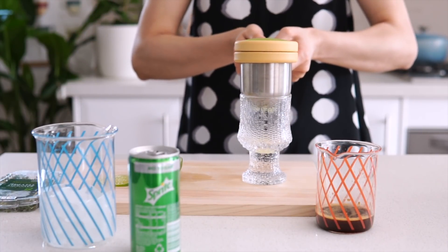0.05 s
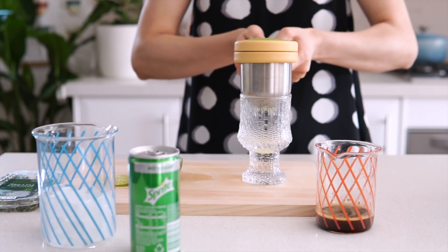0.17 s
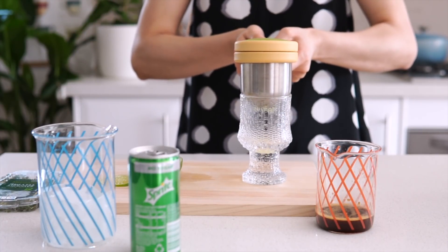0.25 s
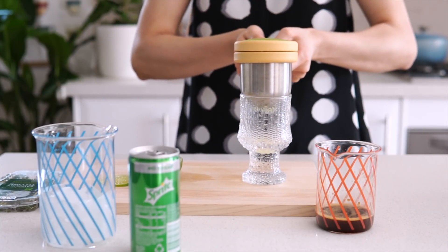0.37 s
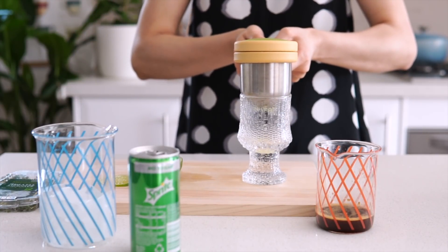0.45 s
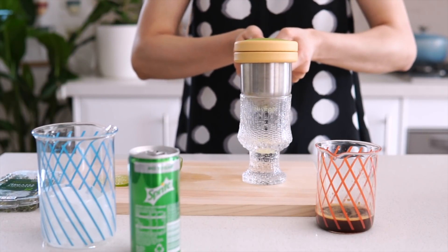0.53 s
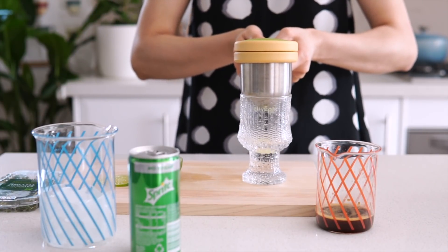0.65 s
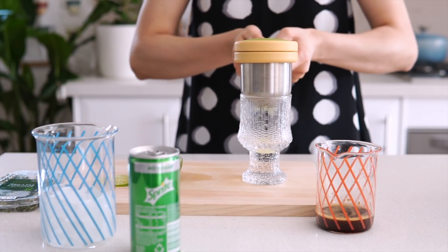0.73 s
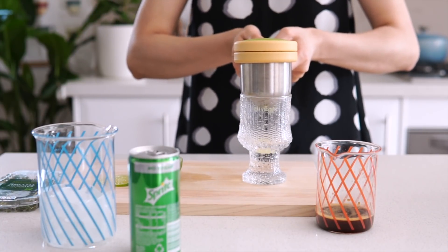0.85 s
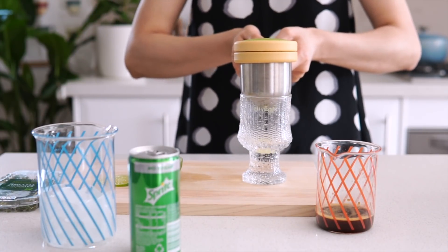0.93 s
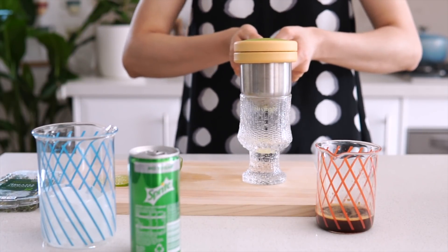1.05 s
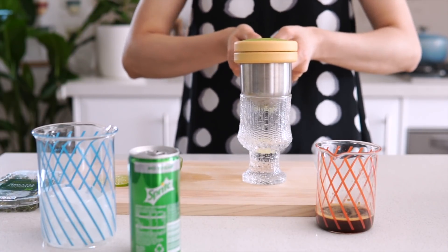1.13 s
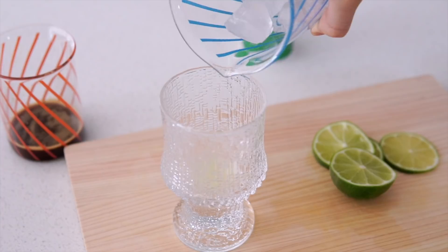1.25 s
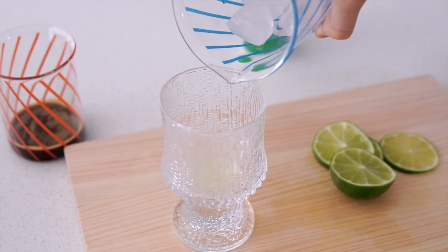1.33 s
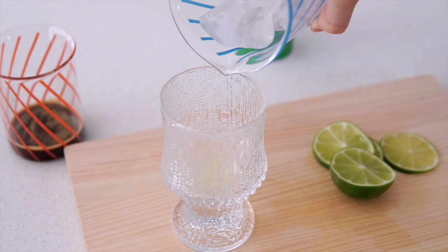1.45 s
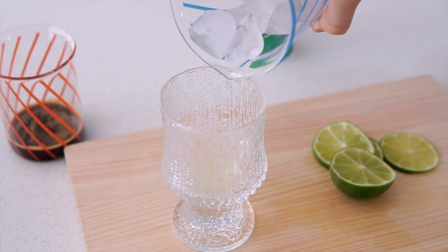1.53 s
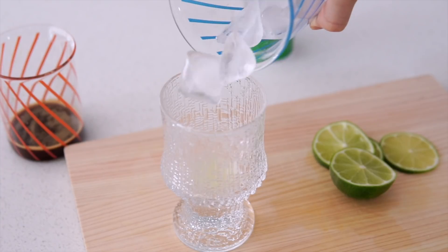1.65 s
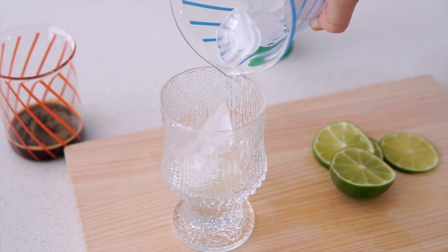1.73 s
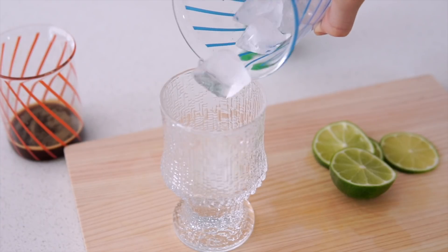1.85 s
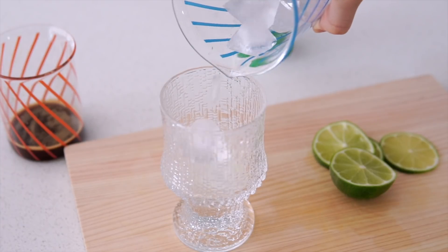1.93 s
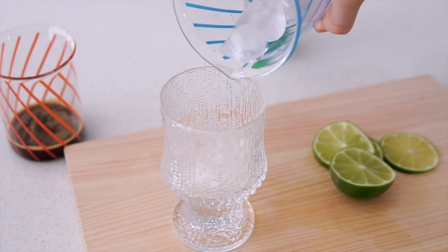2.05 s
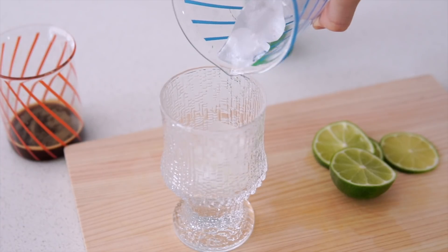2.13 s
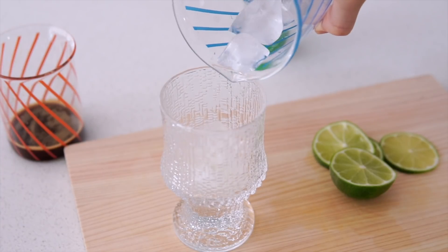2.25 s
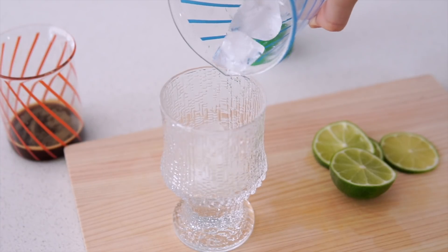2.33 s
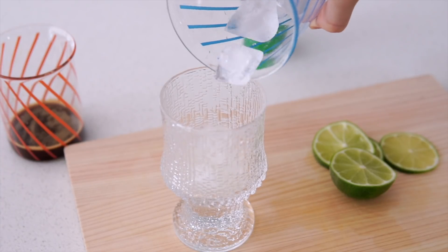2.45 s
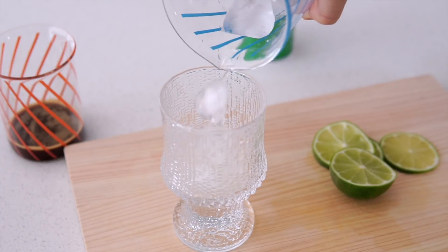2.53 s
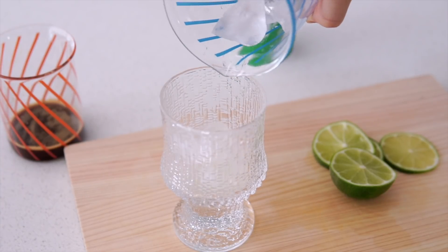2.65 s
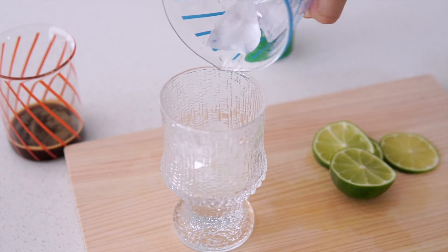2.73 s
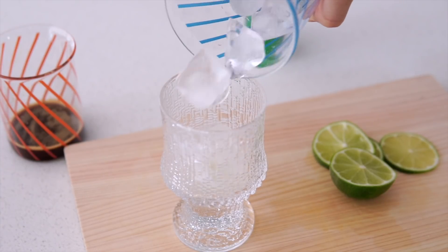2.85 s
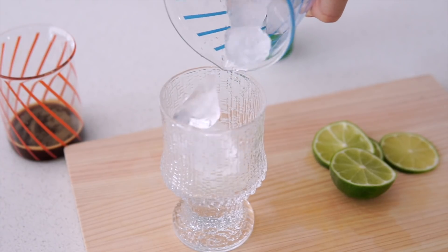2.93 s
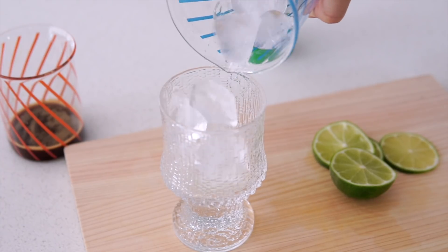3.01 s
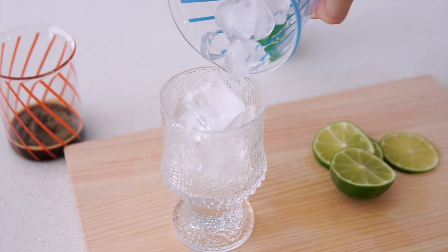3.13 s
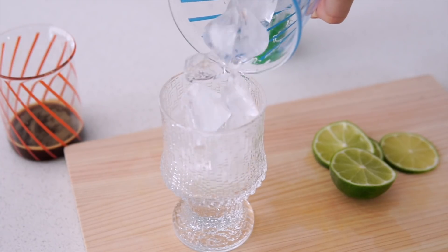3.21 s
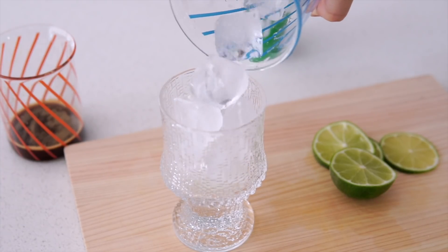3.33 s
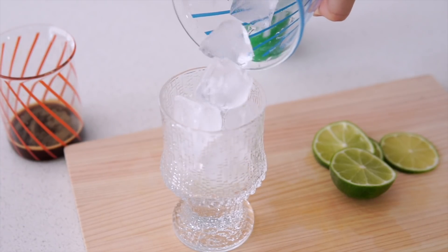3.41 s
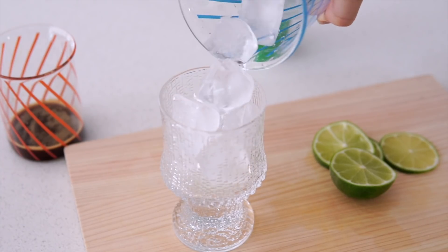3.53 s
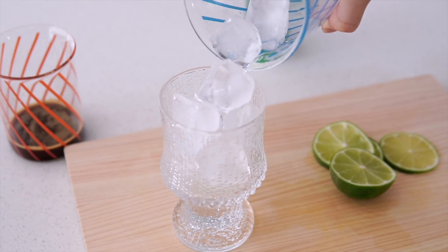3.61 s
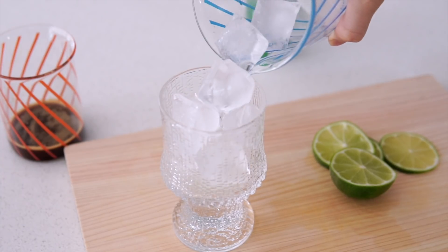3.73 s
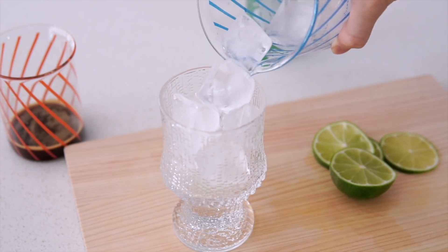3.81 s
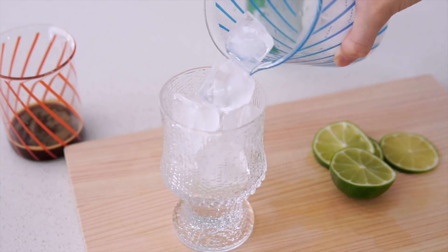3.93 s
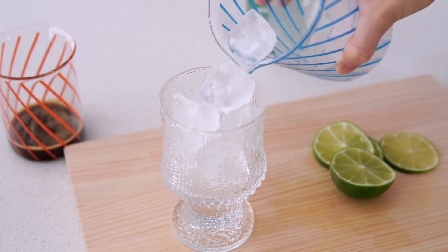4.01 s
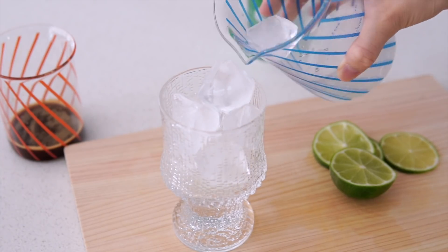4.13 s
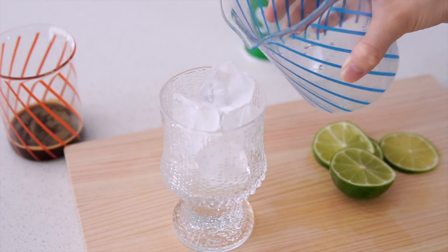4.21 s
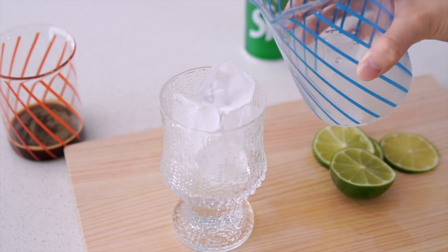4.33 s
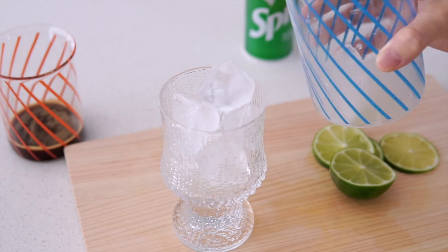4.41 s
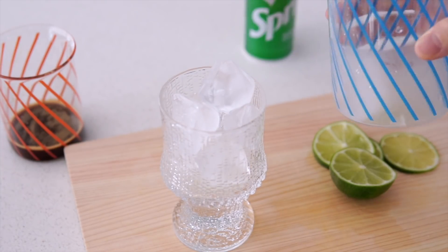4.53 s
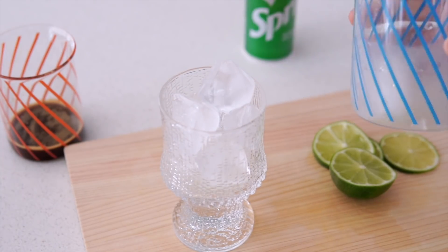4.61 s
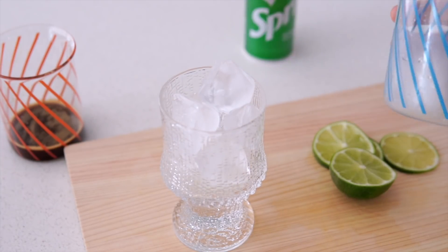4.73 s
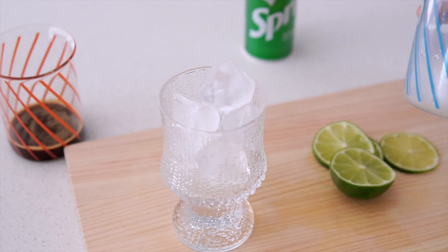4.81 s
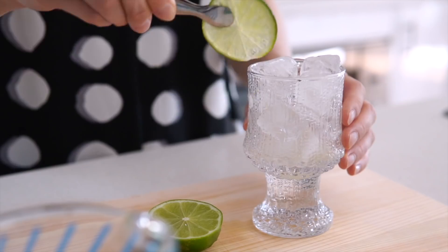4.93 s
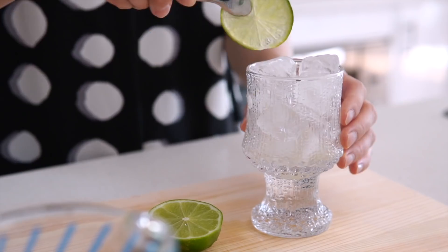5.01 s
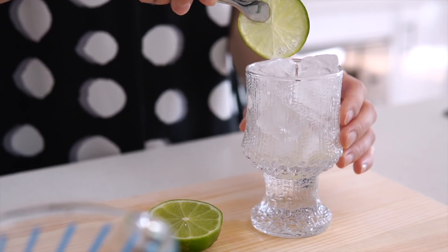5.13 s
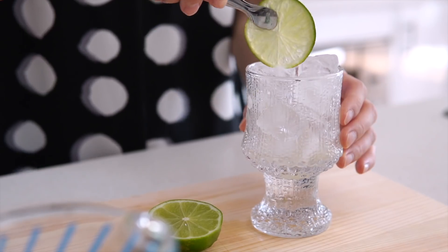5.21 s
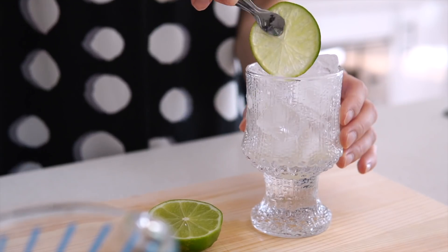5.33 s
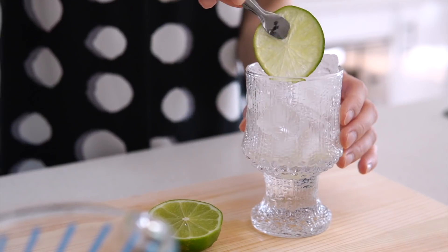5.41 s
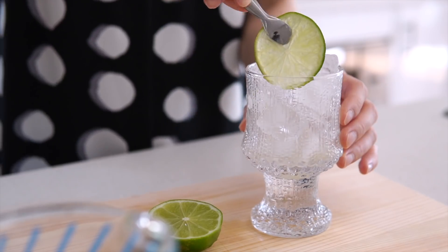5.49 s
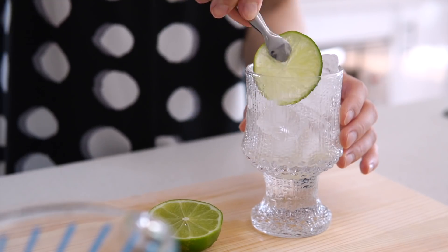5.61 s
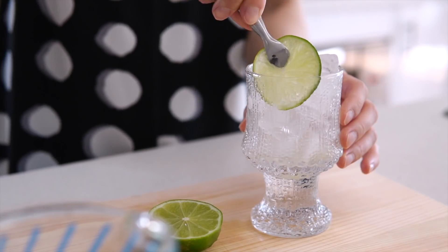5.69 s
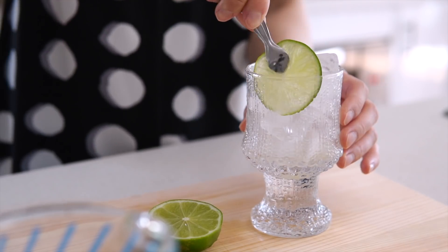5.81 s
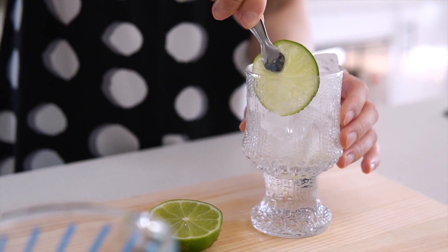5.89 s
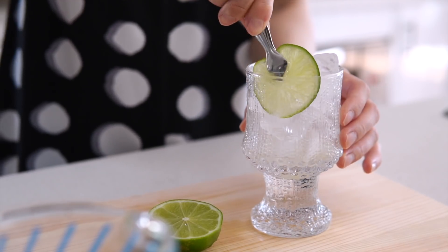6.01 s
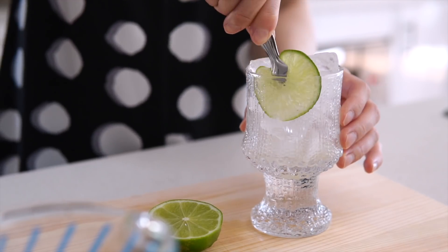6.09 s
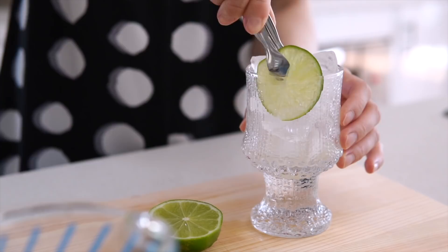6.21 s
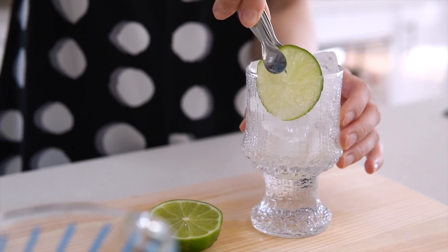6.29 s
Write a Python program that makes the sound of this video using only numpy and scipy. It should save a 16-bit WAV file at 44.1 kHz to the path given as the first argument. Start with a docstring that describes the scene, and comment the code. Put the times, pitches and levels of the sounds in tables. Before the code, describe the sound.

Ice cubes tumble from a thin glass beaker into a heavy goblet, clattering and ringing loudly up close, then a few faint ticks in a kitchen.

```python
"""Ice tipped into a goblet

Ice cubes are tipped from a thin glass beaker into a heavy goblet on a wooden board, in a kitchen.
Noise bursts and short tones make the clacks; showers of them make the jostling, and a lime slice's later rubs.
Both glasses ring as fading sine waves, and their air hollows hoot as resonances stirred by the knocks.
The microphone is close and the loudest blows clip; echoes, a soft rumble and a mains hum fill the room."""
import sys
import numpy as np
from scipy import signal
from scipy.fft import rfft, irfft
from scipy.io import wavfile

SR = 44100
rng = np.random.default_rng(int(sys.argv[2]) if len(sys.argv) > 2 else 0)


def digitize_waveform(pressure):
    """Quantize a signal to 16-bit integers and store it at the path in sys.argv[1].

    Rows of a 2-D input are taken as channels; values are limited to [-1, 1].
    """
    field = np.atleast_2d(pressure).T
    bounded = np.clip(field, -1, 1)
    quanta = np.round(bounded * 32767).astype(np.int16)
    wavfile.write(sys.argv[1], SR, quanta)


N = 280035
TIME = np.arange(N) / SR
SECOND = np.arange(SR) / SR  # time axis of one single sound, s
# In all tables, t60 is the time a sound takes to fade by 60 dB; levels are relative.


def amp(db):
    """Turns decibels into a plain factor."""
    return 10 ** (np.asarray(db) / 20)


def unit(x):
    """Scales to an energy of one."""
    return x / np.sqrt(np.sum(x ** 2) + 1e-20)


def read(points, hz):
    """Reads a table between its points, on a log-frequency axis."""
    f, value = np.transpose(points)
    return np.interp(np.log(hz + 1), np.log(f + 1), value)


def add(mix, s, sound):
    """Mixes a sound in at time s."""
    part = mix[max(round(s * SR), 0):][:len(sound)]
    part += sound[:len(part)]


def coloured(x, db):
    """Filters x with the gain db on its FFT bins, without sounding ahead of time (minimum phase)."""
    cepstrum = irfft(db * np.log(10) / 20)
    cepstrum[1:len(x) // 2] *= 2
    cepstrum[len(x) // 2 + 1:] = 0
    return irfft(rfft(x) * np.exp(rfft(cepstrum)))


def hollow(x, curve, width_hz):
    """A resonance, as of trapped air, whose pitch and strength follow a curve; a narrow one rings longer."""
    s, hz, db = np.transpose(curve)
    # shift the pitch down to zero, smooth there, and shift back up
    turn = np.exp(2j * np.pi * np.cumsum(np.interp(TIME, s, hz)) / SR)
    r = np.exp(-np.pi * width_hz / SR)
    driven = x * amp(np.interp(TIME, s, db))
    smooth = signal.lfilter([1 - r], [1, -r], driven / turn + 1e-18)
    return 2 * (turn * smooth).real


# How the room's rumble is spread over pitch: f/Hz, level/dB
RUMBLE_SPECTRUM = [(12, -54.5), (20, -13.5), (32, -7.5), (46, -3), (65, 0.5), (81, -10), (204, -11),
                   (399, -19.5), (485, -16.5), (2260, -35), (16000, -41.5)]


def room_tone(start_db=-50.5, rise_db=2, hum_db=-49, hum_hz=60):
    """A soft rumble of filtered noise that slowly grows, and a mains hum as one sine wave."""
    gain = amp(read(RUMBLE_SPECTRUM, np.fft.rfftfreq(N, 1 / SR)))
    noise = irfft(rfft(rng.standard_normal(N)) * gain, N)
    rumble = amp(start_db + rise_db * TIME / TIME[-1]) * unit(noise) * np.sqrt(N)
    return rumble + amp(hum_db) * np.sin(2 * np.pi * hum_hz * TIME)


# Basic colour of a clack: f/Hz, level/dB
CLACK_SPECTRUM = [(30, -43), (100, -29), (500, -21), (1200, 2), (2200, 1), (4500, 0), (7000, -3.5),
                  (11000, -8), (16000, -16.5)]
CRACK_T60 = .005  # s


def clack(centre_hz, treble_db, t60, focus_db=9, octaves=.5, crack_db=1, cube_db=-1, cube_t60=.034):
    """One contact of ice: a crack, a dense short rattle and a few brief tones of the cube."""
    t, hz = np.arange(2048) / SR, np.fft.rfftfreq(2048, 1 / SR)
    crack, rattle = rng.standard_normal((2, len(t)))
    burst = unit(rattle * amp(-60 * t / t60))
    burst += amp(crack_db) * unit(crack * amp(-60 * t / CRACK_T60))
    # a hump around the centre pitch
    focus = focus_db * np.exp(-.5 * (np.log2((hz + 1) / centre_hz) / octaves) ** 2)
    shelf = read([(5000, 0.0071), (10000, treble_db)], hz)  # harder contacts are brighter
    burst = coloured(burst, read(CLACK_SPECTRUM, hz) + focus + shelf)
    tones_hz = centre_hz * 2 ** (rng.standard_normal(size=(3, 1)) / 4)
    tones = np.sin(2 * np.pi * tones_hz * t).sum(0) * amp(-60 * t / cube_t60)
    return unit(unit(burst) + amp(cube_db) * unit(tones))


# Single knocks and faint ticks, mostly of ice, the low-pitched ones heavy landings:
# t/s, level/dB, centre of the colour f/Hz
SINGLE_KNOCKS = [(0.189, -38, 4550), (1.264, -12.5, 2410), (1.274, -11.5, 3450), (1.3102, -7, 2180),
                 (1.3271, -5, 2730), (1.3596, -2.5, 3330), (1.3793, 9, 4500), (1.392, 9, 4440),
                 (1.397, 3, 4300), (1.411, 6, 4230), (1.421, 6.5, 5660), (1.429, 7, 7080), (1.463, 7, 4885),
                 (1.5146, -5, 2670), (1.5468, -1, 3680), (1.5578, 1.5, 3533), (1.5836, -2, 4904),
                 (1.6639, -0.5, 4010), (1.775, -2, 1450), (1.8461, 10.5, 3500), (1.8966, -2.5, 3280),
                 (1.9641, 3.5, 1230), (2.0056, -0.5, 4500), (2.0525, 8.5, 9470), (2.08, -1, 8800),
                 (2.021, 2.5, 9470), (2.355, -19.5, 4200), (2.5, -11.5, 5270), (2.609, -2, 1470),
                 (2.7985, -3, 3000), (2.833, -3.5, 3930), (2.874, -2, 4400), (2.925, -1, 3090),
                 (2.946, 6, 1860), (2.965, -2.5, 2430), (3.122, 6.5, 4200), (3.199, -0.5, 3540),
                 (3.259, -5, 3140), (3.286, 2.5, 3450), (3.305, -1.5, 3760), (3.337, 1, 2890),
                 (3.3786, 1, 3720), (3.429, -2.5, 5400), (3.471, -7.5, 3000), (3.5865, -4.5, 3000),
                 (3.9209, -8, 1423), (3.9693, 4, 6440), (4.0754, -9, 3400), (4.2177, -13.5, 3360),
                 (4.2401, 9.5, 4445), (4.249, 11.5, 4580), (4.2937, 2, 3250), (4.3213, -1.5, 4880),
                 (4.3311, -2, 4480), (4.46, -5.5, 3800), (4.4817, -11, 5550), (4.5495, -13.5, 2820),
                 (4.85, -35, 2586), (6.052, -19, 1870), (6.0594, -11, 2530), (6.1748, -12.5, 3000),
                 (6.215, -10.5, 3880), (6.3269, -15.5, 3200)]
# When the knocks happen inside the beaker: start t/s, end t/s
IN_BEAKER = [(0, 1.7), (3.95, 5)]
# Colour of the thud through the board: f/Hz, level/dB
THUD_SPECTRUM = [(30, -16.5), (100, -9), (180, -6), (400, -3.5), (1200, 5.5), (3000, -23.5), (9000, -58)]
MIDDLE_HZ, RATTLE_T60 = 4200, .02  # colour of an ordinary knock, Hz; fading of its rattle, s
# strong knocks and high-pitched ones have more treble
TREBLE_DB, TREBLE_DB_PER_DB, TREBLE_DB_PER_OCTAVE = 3.5, .15, 3
# low-pitched knocks are heavy and push harder; the hand-held beaker passes little of it to the board
WEIGHT_DB_PER_OCTAVE, HELD_DB = 6, -10.5


def knocks(clack_db=13, thud_db=-1, thud_t60=0.017, rattle_db=-3):
    """Each knock gives a bright clack and a dull push into glass and board."""
    clacks, thuds = np.zeros((2, N))
    t, hz = np.arange(2048) / SR, np.fft.rfftfreq(2048, 1 / SR)
    wall_knocks = [(s, db, MIDDLE_HZ) for s, db, _, _ in GOBLET_BLOWS]
    for s, db, centre_hz in SINGLE_KNOCKS + wall_knocks:
        octaves = np.log2(centre_hz / MIDDLE_HZ)
        held = any(a < s < b for a, b in IN_BEAKER)
        treble_db = TREBLE_DB + TREBLE_DB_PER_DB * db + TREBLE_DB_PER_OCTAVE * octaves
        weight_db = db - WEIGHT_DB_PER_OCTAVE * octaves + HELD_DB * held
        add(clacks, s, amp(db + clack_db) * clack(centre_hz, treble_db, RATTLE_T60))
        # a push is a single click with a short noise tail
        tail = unit(rng.standard_normal(len(t)) * amp(-60 * t / thud_t60))
        push = (t == 0) + amp(rattle_db) * tail
        add(thuds, s, amp(weight_db + thud_db) * unit(coloured(push, read(THUD_SPECTRUM, hz))))
    return clacks, thuds


# Path of the goblet's air tone: t/s, f/Hz, level/dB
GOBLET_AIR_PATH = [(1.4, 1000, 2.5), (1.7, 1100, -14), (1.78, 1120, 3.5), (2.95, 1150, 2), (3.3, 1080, 3),
                   (3.6, 990, 2.5), (4.0, 980, -24.5), (4.6, 980, -24), (6.1, 953.6, 5.5)]


def goblet_air(push, level_db=6):
    """The air in the goblet is a broad resonance, set hooting by each push."""
    return amp(level_db) * hollow(push, GOBLET_AIR_PATH, width_hz=47)


# Path of the beaker's air tone: t/s, f/Hz, level/dB
BEAKER_AIR_PATH = [(1.25, 707, 5.5), (1.449, 718, -2.5), (1.65, 690, -2), (1.8, 672, -10.5),
                   (2.85, 662, -6.5), (3.4, 614, -10), (3.95, 580, 8.5), (4.24, 617, 10), (4.55, 639, -5.5)]
# Bumps of the empty beaker that set its air hooting: t/s, level/dB, f/Hz, t60/s
BEAKER_HOOTS = [(3.922, -24, 606, .8), (4.293, -10, 640, .12), (4.297, -23, 613, .45)]


def beaker_air(push, level_db=9):
    """The air in the emptying beaker hoots under each push, and bumps of the beaker add fading sine waves."""
    out = amp(level_db) * hollow(push, BEAKER_AIR_PATH, width_hz=17)
    for s, db, hz, t60 in BEAKER_HOOTS:
        add(out, s, amp(db - 60 * SECOND / t60) * np.sin(2 * np.pi * hz * SECOND))
    return out


# Kitchen reverberation: f/Hz, t60/s, level/dB
KITCHEN_ECHO = [(145.9, 0.097, -13), (684, 0.76, -5.5), (1360, 0.68, -13), (3000, 0.59, -11),
                (4760, 0.69, -14.5), (9500, 0.24, -9.5), (16000, 0.59, -21)]


def kitchen(x, gap_s=0.00075, build_s=0.004):
    """Sparse reflections of random sign, each band dying at its own speed."""
    room, taps = np.array(KITCHEN_ECHO), np.zeros(SR)
    # one reflection somewhere in every ten samples
    at = np.arange(0, SR - 10, 10)
    taps[at + rng.integers(0, 10, len(at))] = rng.choice([-1., 1.], len(at))
    taps *= np.clip((SECOND - gap_s) / build_s, 0, 1)
    hz, t, bands = signal.stft(taps, SR, nperseg=256)
    t60 = read(room[:, :2], hz)[:, None]
    tail = unit(signal.istft(bands * amp(-60 * t / t60), SR, nperseg=256)[1][:SR])
    tail = coloured(tail, read(room[:, ::2], np.fft.rfftfreq(SR, 1 / SR)))
    return signal.fftconvolve(x, tail)[:N]


# a slide or rub starts quickly, loses speed and comes to rest
SLIDE_ATTACK_S, SLIDE_SAG_DB_PER_S, SLIDE_REST_DB_PER_S = 0.01, -16, -220


def sliding(slides):
    """Strength of the sliding: each slide has an attack, a sagging hold and a release."""
    out = np.zeros(N)
    for s, length, db in slides:
        fade_db = SLIDE_SAG_DB_PER_S * SECOND + SLIDE_REST_DB_PER_S * np.maximum(SECOND - length, 0)
        add(out, s, np.minimum(SECOND / SLIDE_ATTACK_S, 1) * amp(db + fade_db))
    return out


def contacts(slides, per_s, spread_db, centre_hz, treble_db, t60, count=24):
    """Many small contacts between sliding surfaces, a few larger than the rest."""
    happens = rng.random(N) < per_s / SR
    sizes = amp(spread_db * np.minimum(rng.exponential(1, N), 2)) * happens
    sizes = unit(sizes) * np.sqrt(N) * sliding(slides)
    # a stock of different clacks, picked at random for each contact
    cubes = [clack(centre_hz * 2 ** (.5 * rng.standard_normal()), treble_db, t60) for _ in range(count)]
    which, out = rng.integers(0, count, N), np.zeros(N)
    for i in np.flatnonzero(sizes):
        add(out, i / SR, sizes[i] * cubes[which[i]])
    return out


# Slides of the cubes over each other: start t/s, length t/s, level/dB
CUBE_SLIDES = [(1.238, 0.034, -31), (1.385, 0.053, -12), (1.55, 0.36, -24), (1.78, 0.33, -19),
               (2.29, 0.39, -40.5), (2.75, 0.29, -24.5), (2.94, 0.22, -13.5), (3.18, .22, -18.5),
               (3.7, 0.25, -51.5), (3.96, 0.21, -42), (4.245, 0.085, -28), (4.46, 0.086, -32),
               (4.79, 0.052, -59)]
# Rubs of the lime slice over the ice: start t/s, length t/s, level/dB
LIME_RUBS = [(5.63, 0.22, -56), (5.92, 0.15, -55.5), (6.04, 0.071, -42.5), (6.18, 0.054, -32),
             (6.29, .06, -43)]


def jostle():
    """Cubes slide over each other; later the lime slice rubs across them, duller and with denser contacts."""
    cubes = contacts(CUBE_SLIDES, per_s=150, spread_db=4, centre_hz=3800, treble_db=0, t60=.011)
    lime = contacts(LIME_RUBS, per_s=450, spread_db=10.5, centre_hz=3630, treble_db=-16, t60=0.015)
    return cubes + lime


# Ringing tones (modes) of the goblet wall, swinging freely: f/Hz, level/dB, t60/s
GOBLET_MODES = [(2411, 4.5, .8), (4431, -1, .42), (7111, -1, .36), (9350, -1, .25), (10510, -7, .22),
                (11370, -3, .18), (11470, -5, .32), (14820, -12, .2), (15630, -7, .2)]
GRIP_S = 5  # a hand grips the glass, s


def chatter(ice, level_db=8, freedom=.3):
    """Ice that tumbles inside the goblet keeps its wall modes chiming, until a hand grips the glass."""
    in_beaker = np.any([(a < TIME) & (TIME < b) for a, b in IN_BEAKER], axis=0)
    inside = ice * (TIME < GRIP_S) * ~in_beaker
    out = np.zeros(N)
    for hz, db, t60 in GOBLET_MODES:
        width_hz = np.log(1000) / np.pi / (t60 * freedom)  # the ice shortens t60
        out += hollow(inside, [(0, hz, db + level_db)], width_hz)
    return out


# Blows on the goblet wall: t/s, clack level/dB, ring level/dB,
# hardness level/dB (how far the second mode stands over the lowest)
GOBLET_BLOWS = [(1.736, -6.5, -8.5, -6), (1.785, 8, -5, -15), (1.826, 5.5, -7.5, -17),
                (1.973, -2, -21.5, 1.5), (2.031, -3.5, -21.5, 10), (2.07, -3, -16.5, 9),
                (2.166, -10.5, -14.5, -11), (2.463, -19, -28.5, -9.5), (2.6242, 9.5, -20, 1.5),
                (2.642, 2.5, -6, 0.5), (2.682, -7.5, -32, 27), (2.735, 0, -26, 11), (2.9384, 9, -8.5, 4.5),
                (2.979, 0, -11, 18), (3.022, 6.5, -12.5, 20), (3.063, 8, -18.5, 28), (3.107, -9, -12, -2),
                (3.142, 1.5, -15.5, 14.5), (3.167, 11.5, -13.5, 11.5), (3.225, 4.5, -27.5, 22.5),
                (3.328, 4, -26.5, 11.5), (6.0833, -9.5, -52, 12)]
# Ice leaning on the wall shortens the ring: t/s, factor on t60
GOBLET_FREEDOM = [(1.7, 0.77), (2.4, 0.58), (2.7, 0.33), (3.0, 0.22), (3.5, 0.14)]
HIGH_MODES_DB, HIGH_MODES_SHARE = -5.5, 0.78  # the high modes lie lower and follow a share of the hardness


def goblet(level_db=-1.5, twin_db=-11, split_hz=13, jolt_turns=.28):
    """Blows pour energy into the wall modes and jolt their swing; each mode beats with a close twin."""
    out = np.zeros(N)
    for k, (hz, db, t60) in enumerate(GOBLET_MODES):
        energy, jolts = np.zeros((2, N))
        for s, _, ring_db, hard_db in GOBLET_BLOWS:
            mode_db = ring_db + np.array([0, hard_db, HIGH_MODES_DB + HIGH_MODES_SHARE * hard_db])
            freedom = np.interp(s, *np.transpose(GOBLET_FREEDOM))
            fade = np.exp(-2 * np.log(1000) * SECOND / (t60 * freedom))
            add(energy, s, amp(mode_db[min(k, 2)]) ** 2 * fade)
            jolts[round(s * SR)] = jolt_turns * rng.standard_normal()
        turns = hz * TIME + np.cumsum(jolts)
        # the twin lies lower, and further away for the higher modes
        twin_turns = turns - split_hz * np.sqrt(k + 1) * TIME + rng.random()
        pair = np.sin(2 * np.pi * turns) + amp(twin_db) * np.sin(2 * np.pi * twin_turns)
        out += amp(db + level_db) * np.sqrt(energy) * pair
    return out


# Clear clinks of a cube on a glass rim: t/s, level/dB, factor on the low modes' f,
# factor on the high modes' f, factor on t60
RIM_CLINKS = [(3.589, -19, .853, .9, .5), (3.921, 6, 1.018, 1.008, .58), (3.969, -13, 1.012, 1.015, 1.4),
              (4.2397, 4, .965, .96, .27), (4.462, -16, .86, 1.0, .4), (4.549, -29, .79, .99, .7)]
# Modes of a clink, before those factors: f/Hz, level/dB, t60/s
CLINK_MODES = [(2763, -25, 0.17), (2984, -6.5, 0.21), (3116, 1, 0.14), (4470, -22.5, 0.36),
               (4385, -26.5, 0.36), (5120, -2, 0.067), (4970, 1, 0.11), (5035, -10.5, 0.32),
               (5520, -26, 0.39), (7010, -14, 0.2), (8070, -17, .15), (9656, -19.5, 0.1536)]
LOW_CLINK_HZ = 3800  # modes below this count as low


def clinks():
    """A cube that strikes a rim cleanly rings with clusters of close modes, each a fading sine wave."""
    out = np.zeros(N)
    for s, blow_db, low_pitch, high_pitch, freedom in RIM_CLINKS:
        for hz, db, t60 in CLINK_MODES:
            pitch = low_pitch if hz < LOW_CLINK_HZ else high_pitch
            level = amp(blow_db + db - 60 * SECOND / (t60 * freedom))
            add(out, s, level * np.sin(2 * np.pi * hz * pitch * SECOND))
    return out


def scene(board_db=-2, clack_to_air_db=-12, ring_to_room_db=-4):
    """Knocks stir the air in both glasses; everything but the room tone sounds into the kitchen."""
    clacks, thuds = knocks()
    ice = clacks + jostle()
    push = thuds + amp(clack_to_air_db) * ice
    air = goblet_air(push) + beaker_air(push)
    near = ice + air + amp(board_db) * thuds + clinks()
    ring = goblet() + chatter(ice)
    echo = kitchen(near + amp(ring_to_room_db) * ring)
    return (near + ring + echo + room_tone())[None]


def record(dry, edge_hz=16050):
    """The loudest blows overload the input and clip at full scale; then the top treble is cut off."""
    low_pass = signal.firwin(401, edge_hz, window=("kaiser", 8), fs=SR)
    return signal.oaconvolve(np.clip(dry, -1, 1), low_pass[None], "same")


dry = scene()
out = record(dry)
digitize_waveform(out)
```